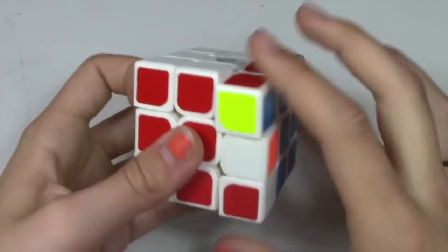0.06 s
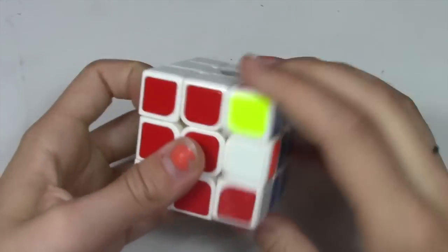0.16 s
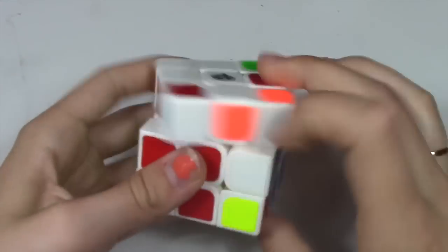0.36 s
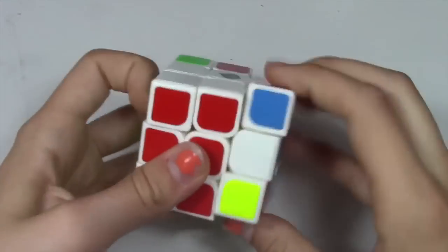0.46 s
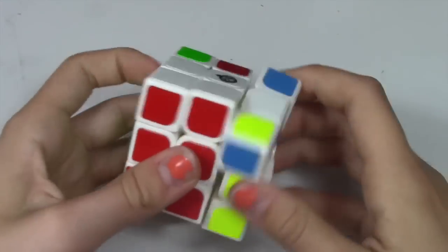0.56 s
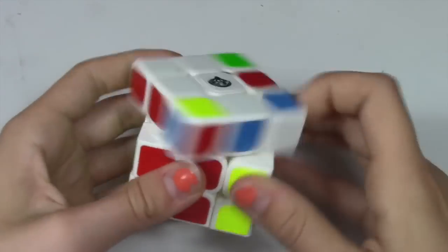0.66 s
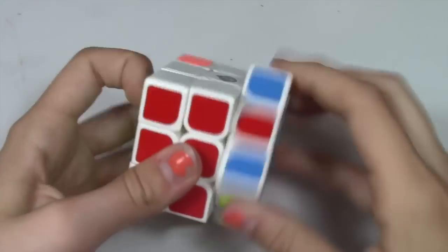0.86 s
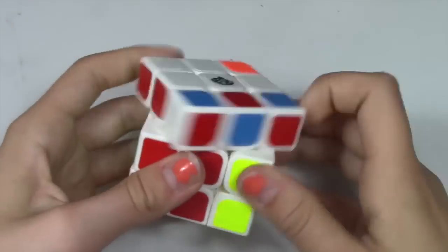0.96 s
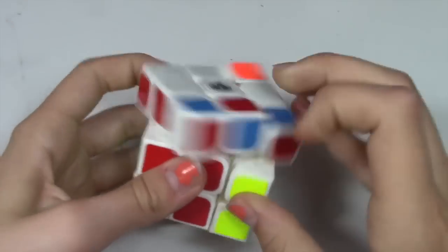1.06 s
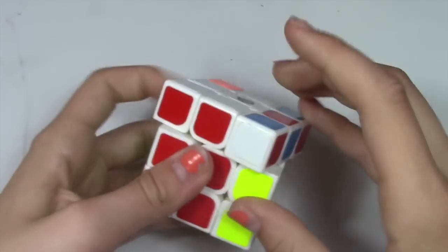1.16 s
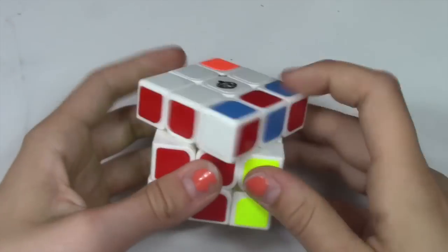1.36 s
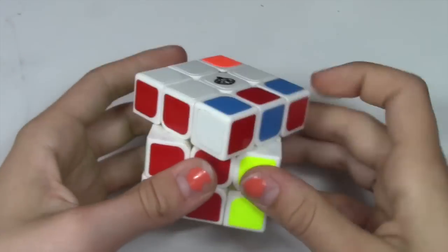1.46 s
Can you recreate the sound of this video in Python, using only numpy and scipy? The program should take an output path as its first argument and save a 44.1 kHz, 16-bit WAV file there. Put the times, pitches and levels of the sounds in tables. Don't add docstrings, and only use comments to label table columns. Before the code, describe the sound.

A hollow plastic puzzle cube is turned quickly by hand, close up. Barely audible finger ticks come first, then sharp, loud clicks crowd together from 0.2 to 0.45 seconds. A second run starts softly and peaks around 0.6 to 0.8; a third, looser one ends with hard snaps near 1.1. Sliding rattles fill between. A light regrip clicks at 1.36, over faint room hiss and low fan hum.

```python
import sys
import numpy as np
from scipy import signal
from scipy.fft import rfft, irfft, next_fast_len
from scipy.io import wavfile
from scipy.ndimage import map_coordinates

SR = 44100
rng = np.random.default_rng(int(sys.argv[2]) if len(sys.argv) > 2 else 0)


def persist_wave(psi):
    counts = np.round(np.clip(psi, -1, 1) * 32767).astype(np.int16)
    wavfile.write(sys.argv[1], SR, np.atleast_2d(counts).T)


def rack_gain(trim_db):
    fader = np.asarray(trim_db, float)
    return 10 ** (fader / 20)


N = 66150

# (time [s], level [dB], pitch of the struck piece [Hz], brightness [dB])
TURN_CLICKS = [(0.1992, -31, 2350, -7), (0.206, -4.5, 2030, -6.0), (0.2099, -5, 2990, -3),
               (0.2113, -4.5, 2350, -5), (0.2142, -19, 2040, 2), (0.2249, -14, 2500, -5.5),
               (0.2269, -7.5, 3370, -5.5), (0.2309, -12.5, 1530, 1.5), (0.2445, -21.5, 3500, -7.5),
               (0.247, -14, 3000, -6), (0.2511, -13, 1700, -2.5), (0.255, -11.5, 3600, 5.5),
               (0.2568, -10, 2050, 3.5), (0.2607, -6.5, 1730, -1), (0.2628, -8.5, 4640, 2.5),
               (0.2674, -11.5, 2570, 1.5), (0.2822, -7, 3010, -9), (0.3137, -27, 2660, -4),
               (0.3239, -5.5, 3100, -7.5), (0.33, -15, 2810, -4), (0.3437, -19.5, 3060, -1),
               (0.3457, -11.5, 3220, -2), (0.35, -17, 2570, -7.5), (0.3568, -2.0, 4810, -3),
               (0.3581, -6.5, 5430, -2.5), (0.3659, -11, 3130, -5), (0.3704, -7.5, 2870, -4),
               (0.373, -10.5, 2930, -7), (0.3742, -8.5, 1950, -4.5), (0.3838, -12.5, 2470, -0.5),
               (0.3866, -13.5, 1506, 2), (0.3937, -20, 2640, -6), (0.4004, -18.5, 2950, -5),
               (0.4111, -5.5, 3450, -14), (0.4143, -13, 3900, -9), (0.4307, -29, 2850, 1),
               (0.4608, -22, 2760, 5),
               (0.4798, -22, 2930, -6), (0.4862, -25.5, 2650, -6.5), (0.496, -21, 2400, -5),
                (0.513, -26.5, 2800, -9), (0.5157, -13.5, 2030, -10), (0.519, -22, 2670, -5.5),
                (0.5319, -20.5, 1830, -11.5), (0.5382, -18.5, 3860, -2.5), (0.5532, -30, 2600, -2),
                (0.5668, -26, 4700, -5.5), (0.575, -33, 4500, 6), (0.5905, -19.5, 3280, -11),
                (0.6058, -9, 3070, -15.5), (0.6109, -10.5, 3650, -11), (0.612, -14, 3000, -2),
                (0.6147, -10, 2690, -1), (0.6163, -13.5, 2300, -3), (0.6181, -12, 3080, -5.5),
                (0.625, -24, 2850, -8), (0.6607, -37, 3110, -8.5), (0.688, -20, 3260, -3),
                (0.6932, -11.5, 2860, -14), (0.706, -17, 3020, -10.5), (0.712, -10.5, 3220, -5),
                (0.7151, -8, 3120, -8), (0.7165, -8, 3260, -7), (0.7193, -16.5, 2920, -4.5),
                (0.7343, -20, 2940, 1), (0.74, -11, 2860, -6), (0.752, -12, 3400, -5),
                (0.7531, -8, 2780, -3), (0.7584, -15.5, 2480, 8), (0.7694, -11.5, 2130, -4),
                (0.7775, -13, 2470, -6), (0.7947, -11.5, 2940, 0.5), (0.7968, -10, 3200, 0.5),
                (0.7991, -2, 3004, -8.5),
               (0.8495, -27, 2690.0, -9), (0.858, -21, 2300.0, 3.5), (0.8619, -18, 2070, -10),
               (0.878, -14.5, 2530, -14), (0.8846, -12.5, 1697, -5.5), (0.8945, -27, 3060, -14),
               (0.8993, -22.5, 2670, 2.5), (0.908, -30.5, 1700, -9), (0.9197, -26.5, 1530.0, -3.5),
               (0.9423, -21, 2100, -10), (0.9495, -12, 3360, -5.5), (0.9514, -11.5, 2190, 0.5),
               (0.9648, -19.5, 3470, -5), (0.9744, -21, 3150, -7.5), (0.9818, -21, 2880, -0.5),
               (0.9946, -24, 2910.0, -12), (1.0038, -30, 2660, 3), (1.0184, -36, 2500, 4),
               (1.0265, -12, 2650.0, 2), (1.0283, -7, 2910, 1.5), (1.0291, -15, 2735, -7.5),
               (1.0322, -15.5, 3340, -5.5), (1.069, -13, 2450, 4.5), (1.0734, -13.5, 3540, -3),
               (1.0776, -9, 3890, -8), (1.0877, -21, 2960, 2.5), (1.1021, -20.5, 3020, 5),
               (1.1055, -6, 2926, -1.5), (1.1065, -3.5, 3290, -2), (1.1097, -9.5, 2810, -6),
               (1.111, -12, 4680, -7), (1.1148, -24.5, 2910, -5), (1.166, -46, 3010, 7),
               (1.181, -48, 3000, 5.5)]
FINGER_TICKS = [(0.0307, -42.5, 1570, -9.5), (0.0338, -50.5, 2280, 11), (0.0403, -46, 1407, 3),
                (0.0436, -48, 1836, 4.5), (0.0925, -51, 2600, 3.5), (0.111, -56, 1420.0, 2),
                (0.151, -57, 2330.0, 9.5), (0.177, -47, 2170, 8.5), (0.1831, -32, 1570, -8.5),
                (1.3004, -38, 2350, 6), (1.306, -39, 2330, 2), (1.3243, -40, 2830, -10),
                (1.3545, -35, 2470, -16), (1.3604, -20.5, 2430, -12), (1.364, -24.5, 3070, -13),
                (1.3688, -28.5, 2930, -7.5), (1.3749, -36, 2580, -12.0), (1.3848, -43, 2290, 3),
                (1.398, -52.5, 2460, 5), (1.4418, -42.5, 2990, -13.5)]
# (middle [s], length [s], level [dB])
RATTLES = [(.008, 0.093, -55.5), (0.182, 0.027, -53), (0.221, 0.052, -27.5), (0.26, 0.036, -20.5),
           (0.284, 0.058, -25.5), (0.336, 0.043, -27), (0.374, 0.014, -17.5), (0.387, 0.028, -28),
           (0.404, 0.073, -34.5), (0.576, 0.38, -46), (0.616, 0.026, -29), (0.687, 0.33, -49.5),
           (0.717, 0.039, -25), (0.756, 0.03, -20.5), (0.8, 0.035, -27), (0.855, 0.095, -38.5),
           (0.879, 0.0093, -32), (0.9, 0.035, -30.5), (0.951, 0.013, -29), (0.97, 0.081, -32.5),
           (1.031, 0.017, -28), (1.085, 0.053, -28), (1.113, 0.029, -31), (1.135, 0.14, -46.5),
           (1.013, 0.022, -42.5), (1.37, 0.033, -44)]
# (time [s], level [dB])
CORE_KNOCKS = [
    (.461, -28),
    (.899, -26.5),
    (1.032, -27.5),
    (.779, -29),
    (1.362, -43),
]
# (pitch [Hz], width [Hz], level [dB])
BODY = [(815, 91, -8), (1044, 130, -14.5), (1444, 152, -3.5), (1827, 460, -4), (2300, 900, -3.5),
        (2900, 450, 0), (3470, 494, -3.5), (4710, 840, -9.5)]
# (pitch [Hz], width [Hz], level [dB])
EDGES = [(6610, 3000, 1), (9480, 3300, 2), (12250, 4060, -6), (14600, 1000, -22.5)]
# (frequency [Hz], time to fall 60 dB [s])
ROOM_DECAY = [(1500, .25), (4700, .25), (10000, .15)]
# (frequency [Hz], level [dB])
STEREO_SPREAD = [(800, -29), (3000, -26), (7000, -17)]
# (frequency [Hz], level per Hz [dB])
HISS_COLOR = [(28, -23.5), (48, -6.5), (300, -5.5), (700, -10), (1100, -14.5), (2700, -20.5), (9000, -28),
              (16000, -37.5)]
# (pitch [Hz], width [Hz], level [dB])
FAN_HUM = [(113, 10, 1), (136, 38, 3), (55, 21, -10)]
# (loudness [dB], frequency below which it is kept [Hz])
SIDE_ALWAYS_KEPT = [(-60, 2600), (-45, 1000), (-25, 650)]
SIDE_BORDERS = [1700, 2300, 3500, 4300]
SIDE_CHANCE = [.25, .08, .15, .12, .3]


def unit(x):
    return x / np.sqrt(np.mean(x ** 2) + 1e-20)


def along(points, hz):
    f, value = np.transpose(points)
    return np.interp(np.log(hz + 1), np.log(f + 1), value)


def filtered(x, response):
    size = next_fast_len(N + SR // 2)
    spectrum = rfft(x, size) * response(np.fft.rfftfreq(size, 1 / SR))
    return irfft(spectrum, size)[..., :N]


def ringing(x, modes):
    def shape(f):
        total = 0
        for k, (center, width, db) in enumerate(modes):
            peak = 1j * f * width / (center * center - f * f + 1j * f * width)
            total = total + (-1) ** k * rack_gain(db) * peak
        return total

    white_power = np.mean(abs(shape(np.linspace(1, SR / 2, num=2000))) ** 2)
    return filtered(x, shape) / np.sqrt(white_power)


def clicks():
    events = TURN_CLICKS + FINGER_TICKS
    start, db, hz, bright_db = np.transpose(events)[..., None]
    t = np.arange(SR // 25) / SR
    where = (np.round(start * SR).astype(int) + np.arange(len(t))).ravel()

    def lay(rows):
        return np.bincount(where, rows.ravel(), N + SR)[:N]

    def fading(level_db, t60):
        return rack_gain(level_db - 60 * t / t60)

    rise = 1 - np.exp(-t / 0.00012)
    noise = rng.standard_normal((len(start), 2, len(t)))
    piece = fading(db, 0.0095) * rise * np.sin(2 * np.pi * hz * t)
    shell = fading(db - 5, 0.011) * rise * noise[:, 0]
    edge = fading(db + bright_db, 0.009) * rise * noise[:, 1]
    thud = fading(db - 27, 0.023) * np.sin(2 * np.pi * 400 * t)
    return lay(piece + thud) + ringing(lay(shell), BODY) + ringing(lay(edge), EDGES)


def grains():
    rate, scatter_db = 5000, 3
    chance = rng.random(N)
    size = rng.exponential(size=N)
    sign = rng.choice([-1, 1], N)
    return unit((chance < rate / SR) * rack_gain(scatter_db * np.minimum(size, 3)) * sign)


def rattles():
    clump_rate, clump_db, edge_db = 500, 3.5, -6
    t = np.arange(N) / SR
    wander = map_coordinates(rng.standard_normal(N), [t * clump_rate])
    swell = np.zeros(N)
    for middle, length, db in RATTLES:
        swell += rack_gain(db) * np.cos(np.pi * np.clip((t - middle) / length, -.5, .5))
    swell = swell * unit(rack_gain(clump_db * wander))
    body = ringing(swell * grains(), BODY)
    edges = ringing(swell * grains(), EDGES)
    return body + rack_gain(edge_db) * edges


def core():
    note_hz, t60 = 813, .04
    t = np.arange(N) / SR
    knocks = np.zeros(N)
    for start, db in CORE_KNOCKS:
        since = t - start
        knocks += (since > 0) * rack_gain(db - 60 * abs(since) / t60) * np.sin(2 * np.pi * note_hz * since)
    return knocks


def room(x):
    hz, t, noise = signal.stft(rng.standard_normal((2, SR // 2)), SR, nperseg=256)
    fade = rack_gain(-60 * t / along(ROOM_DECAY, hz)[:, None])
    tail = signal.istft(noise * fade, SR, nperseg=256)[1]
    late = np.pad(x, (150, 0))[None]
    return signal.fftconvolve(late, tail / np.linalg.norm(tail[0]), axes=1)[:, :N]


def air():
    hiss_db, hum_db, side_db, hum_side_db = -57, -62, -10, -6
    hiss = unit(filtered(rng.standard_normal((2, N)), lambda hz: rack_gain(along(HISS_COLOR, hz))))
    hum = unit(ringing(ringing(rng.standard_normal((2, N)), FAN_HUM), FAN_HUM))
    hum = hum * rack_gain([[0], [hum_side_db]])
    return (rack_gain(hiss_db) * hiss + rack_gain(hum_db) * hum) * rack_gain([[0], [side_db]])


def scene():
    low_cut_hz, room_dull_hz, room_db = 590, 6480, -14.5
    cube = clicks() + rattles() + core()
    cube = filtered(cube, lambda hz: 1j * hz / (low_cut_hz + 1j * hz))
    dulled = filtered(cube, lambda hz: room_dull_hz / (room_dull_hz + 1j * hz))
    near, far = room(dulled)
    wide = filtered(np.roll(cube, 3) + far, lambda hz: rack_gain(along(STEREO_SPREAD, hz)))
    mid, side = np.array([cube + rack_gain(room_db) * near, wide]) + air()
    return np.array([mid + side, mid - side])


def low_pass(x):
    return signal.sosfilt(signal.butter(12, 16440, fs=SR, output="sos"), x)


def record(dry):
    top_hz, busy_db = 15950, -50
    clipped = dry / (1 + abs(dry) ** 8) ** (1 / 8)
    left, right = filtered(clipped, lambda hz: hz < top_hz)
    hz, _, (mid, side) = signal.stft([left + right, left - right], SR, nperseg=1024)
    level_db = 20 * np.log10(np.linalg.norm(mid[hz > 1000], axis=0) / 2 + 1e-9)
    blocks = len(level_db)
    draws = rng.random((len(SIDE_CHANCE), blocks)).repeat(2, axis=1)[:, :blocks]
    lucky = (level_db > busy_db) & (draws < np.c_[SIDE_CHANCE])
    sure = hz[:, None] < np.interp(level_db, *np.transpose(SIDE_ALWAYS_KEPT))
    kept = sure | lucky[np.searchsorted(SIDE_BORDERS, hz)]
    mid, side = signal.istft(np.array([mid, side * kept]), SR, nperseg=1024)[1][:, :N] / 2
    return low_pass(np.array([mid + side, mid - side]))


dry = scene()
out = record(dry)
persist_wave(out)
```